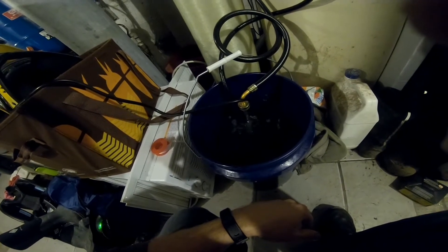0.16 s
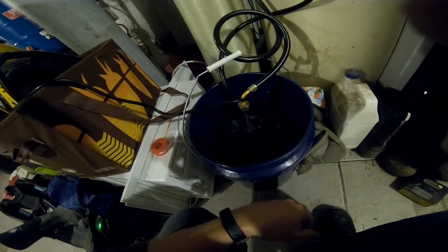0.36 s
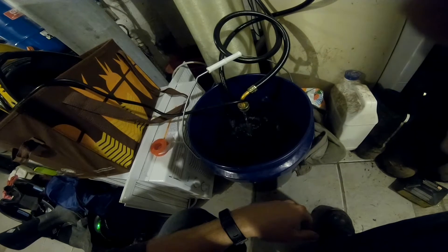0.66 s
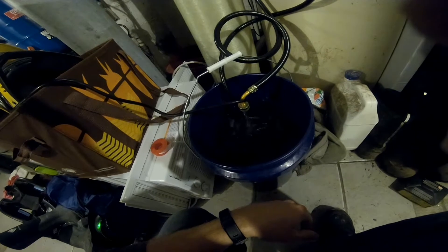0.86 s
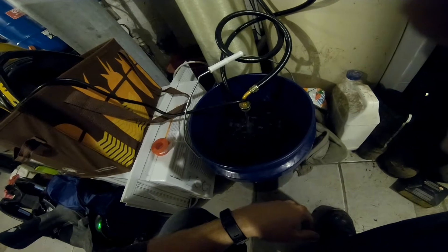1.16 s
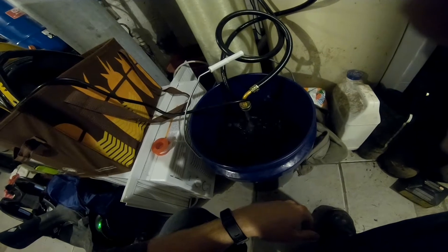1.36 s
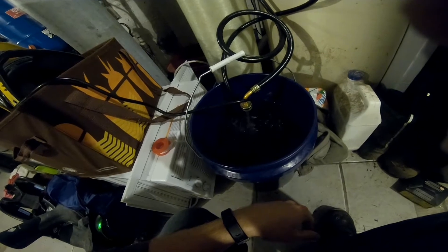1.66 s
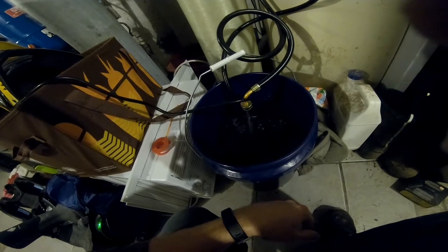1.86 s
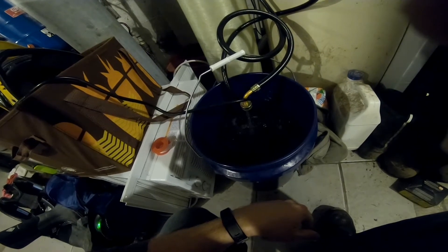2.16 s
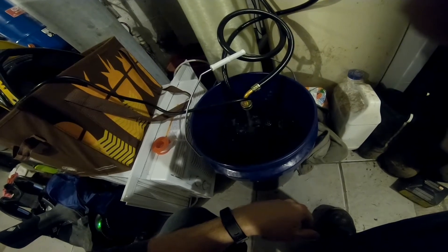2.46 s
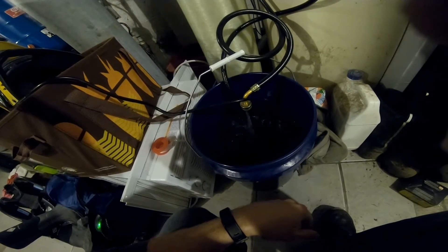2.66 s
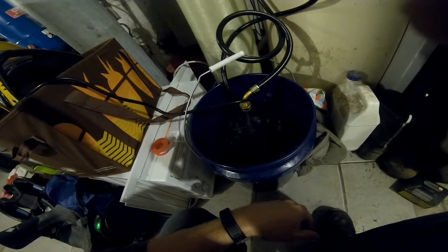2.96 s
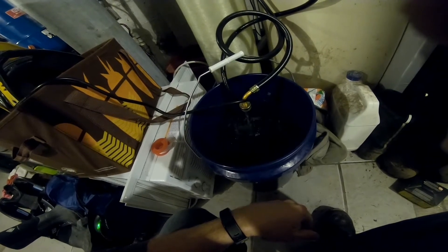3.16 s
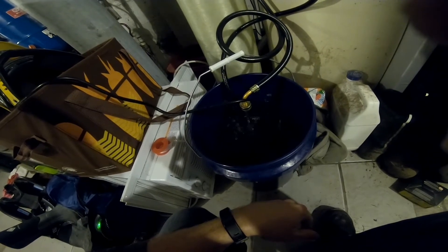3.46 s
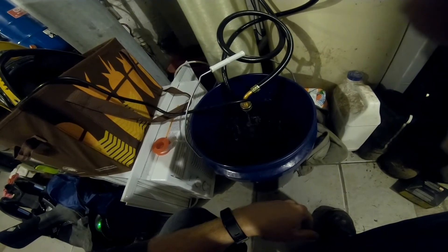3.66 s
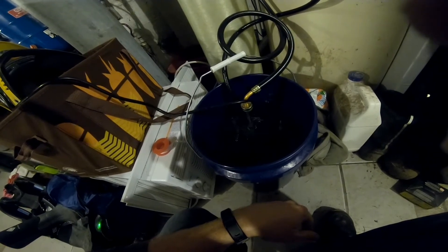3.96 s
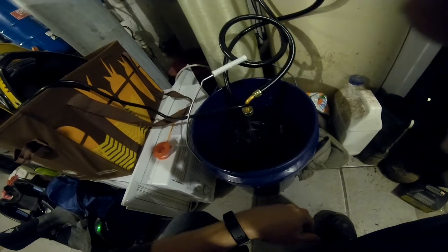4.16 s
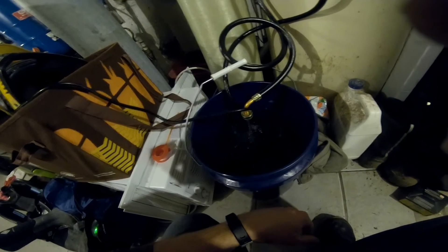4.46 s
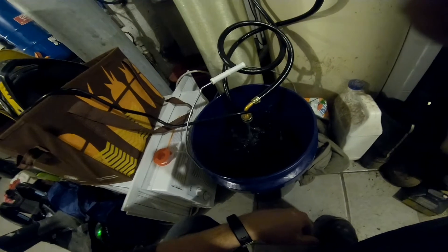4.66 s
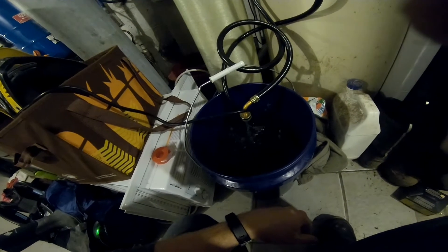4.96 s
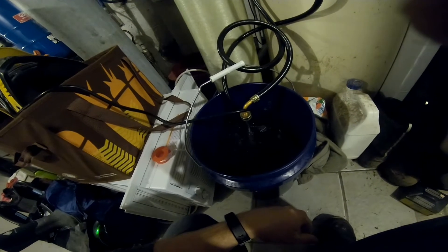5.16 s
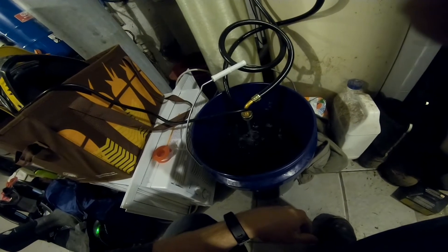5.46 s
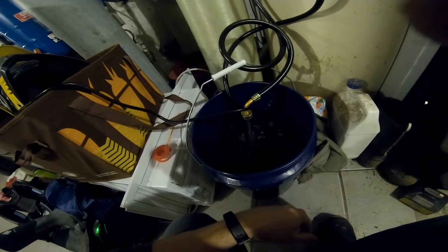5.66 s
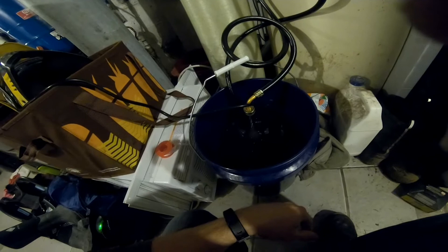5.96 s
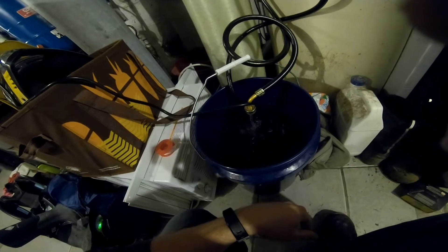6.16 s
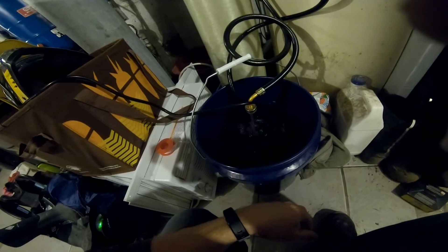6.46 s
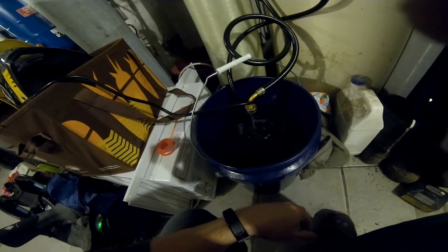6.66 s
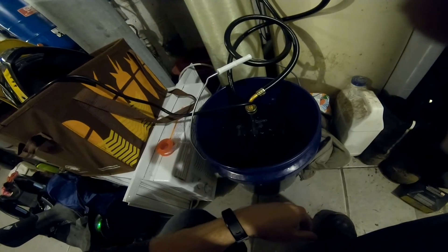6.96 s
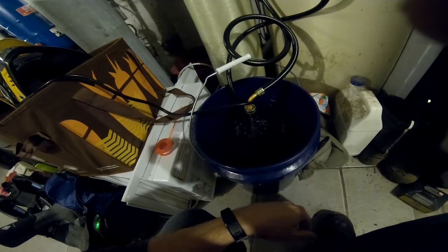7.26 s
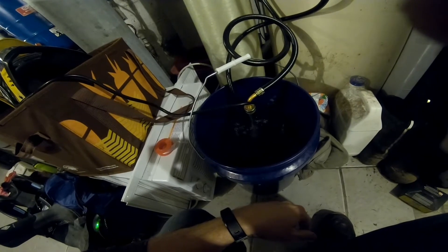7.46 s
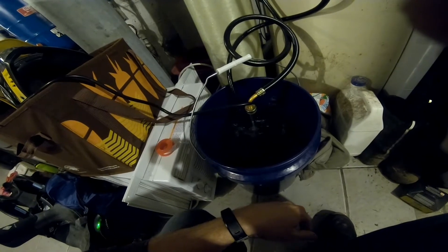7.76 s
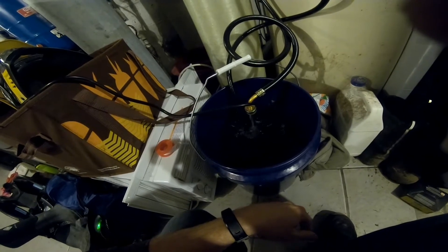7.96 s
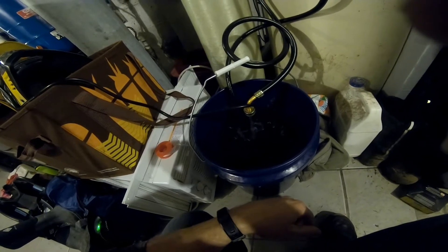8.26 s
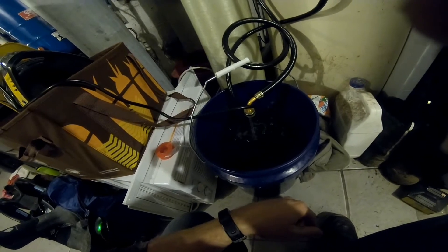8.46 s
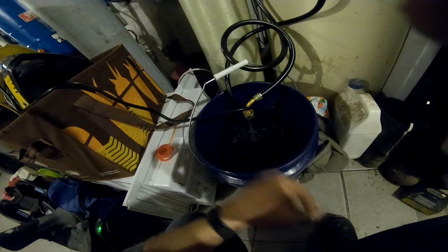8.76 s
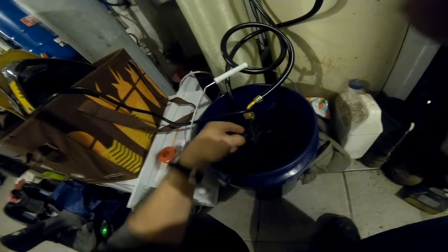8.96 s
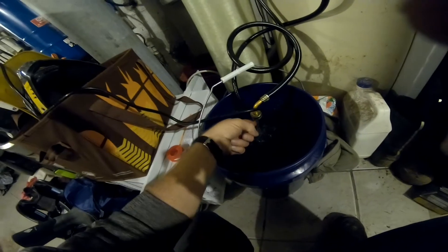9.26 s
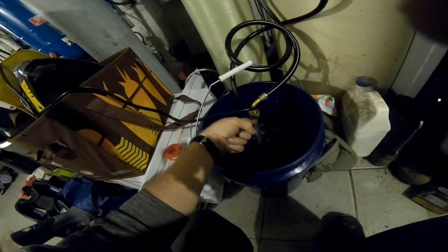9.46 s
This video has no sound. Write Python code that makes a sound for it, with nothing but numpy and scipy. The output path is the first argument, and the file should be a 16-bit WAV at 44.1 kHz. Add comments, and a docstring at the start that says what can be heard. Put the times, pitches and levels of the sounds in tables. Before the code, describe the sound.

From 0 to about 9.6 seconds a hose pours liquid continuously into a plastic bucket, heard close in stereo. A small pump holds a steady low hum, wavering slightly, with a dull watery wash and a deep rumble whose strength drifts, fuller around 2.6 to 3.4 and 6.6 seconds. Over it come irregular bright spits, several per second, tiny ticks, short rising chirps and fine fizz, ringing briefly in the bucket with a very short room echo. Strong spits stand out near 3.7, 3.9, 5.25 and 7.5; splash clusters near 1.5, 2.4, 4.9 to 5.2, 6.5 and 8.8. Hollow mid-low gurgles recur about once a second, clearer near 0.4, 1.2, 5.4, 8.1 and 9. Two very deep soft thuds fall at 8.0 and 8.8 as the microphone holder shifts. The highest treble is muted, and the pouring never stops.

```python
"""A hose pours liquid back into a plastic bucket in which a small submersible pump runs.
The falling stream spits, bubbles and splashes: short sines with climbing pitch, clicks and noise,
sent through the ringing bucket to two nearby microphone ports. Larger bubbles gurgle below.
The pump motor hums on multiples of twice the mains frequency, as sines that waver a little.
Moving liquid gives filtered noise: a dull wash, and a rumble through bucket and floor."""
import sys
import numpy as np
from scipy import signal
from scipy.fft import rfft, irfft, next_fast_len
from scipy.io import wavfile
from scipy.ndimage import uniform_filter1d

SR = 44100
rng = np.random.default_rng(int(sys.argv[2]) if len(sys.argv) > 2 else 0)


def dump(signal):
    """Clip the signal to [-1, 1] and save it as 16-bit WAV at the path in sys.argv[1]."""
    limited = np.clip(np.atleast_2d(signal).T, -1, 1)
    pcm = np.round(limited * 32767).astype(np.int16)
    wavfile.write(sys.argv[1], SR, pcm)


N = 424241  # length in samples

# How far the left port runs ahead of the right. Each row: frequency in Hz, lead in radians.
LEAD_OF_LEFT = [(30, 0), (400, -.15), (600, 0), (720, 2.1), (2100, 1.8), (3000, 1), (3250, 0), (3800, 1),
                (4700, -.3), (5600, 0), (6900, -.5), (7700, -2.3), (8600, 0)]
# Treble loss of the microphone ports. Each row: frequency in Hz, level in dB.
PORT_LOSS = [(6800, -1), (7600, -4), (8500, -16), (10000, -21.5), (12000, -38.5), (15000, -46)]
# Tone colour of the small drops. Each row: frequency in Hz, relative level in dB.
DROP_COLOUR = [(700, 0), (1300, -5.5), (2400, -1.5), (3500, -5.5), (5000, -2.5), (6400, -1), (8000, -6),
               (9500, -2.5), (12000, -23)]


def gain_of(db):
    """Turns decibels into a factor."""
    return 10 ** (np.asarray(db) / 20)


def evened(x):
    """Scales a sound to an average (rms) level of 1."""
    return x / np.sqrt(np.mean(x ** 2) + 1e-20)


def read(points, hz):
    """Reads a table at the frequencies hz, with straight lines between points on a log scale."""
    f, value = np.transpose(points)
    return np.interp(np.log(hz + 1), np.log(f + 1), value)


def shaped(x, gain):
    """Filters x by a gain given as a function of frequency."""
    size = next_fast_len(N + 8192)  # spare room for the ringing after the end
    spectrum = rfft(x, size) * gain(np.fft.rfftfreq(size, 1 / SR))
    return irfft(spectrum, size)[..., :N]


def add(mix, s, sound):
    """Adds a sound to the mix at s seconds."""
    part = mix[round(s * SR):][:len(sound)]
    part += sound[:len(part)]


def modes(table, hz):
    """Resonances: each answers most at its own frequency, over its own width."""
    return sum(gain_of(db) / (1 + 2j * (hz - f) / width) for f, width, db in table)


def scatter(per_s, spread_db, clumps):
    """Random clicks of uneven size, more frequent where clumps is high."""
    happens = rng.random(N) < per_s * clumps / SR
    return happens * gain_of(spread_db * np.minimum(rng.exponential(1, N), 2.9))


def hum():
    """The magnetic pull in the motor makes steady tones that waver a little in level."""
    # Each row: multiple of the pull rate, left level in dB, right level in dB, left's lead in radians.
    tones = [(3, -43.5, -42.5, 0.2), (7, -63, -47, 1.95), (10, -77, -72, 0.45), (11, -64.5, -67, 1.27)]
    pull_hz = 119.93  # twice the mains frequency
    t = np.arange(N) / SR
    out = np.zeros((2, N))
    for order, left_db, right_db, lead in tones:
        waver = gain_of(0.98 * evened(uniform_filter1d(rng.standard_normal(N), 9000)))
        turn = 2 * np.pi * (order * pull_hz * t + rng.random())
        both = np.sin([turn + lead, turn])
        out += np.sqrt(2) * waver * gain_of([[left_db], [right_db]]) * both
    return out


def wash():
    """Pump and swirling liquid make dull steady noise, only partly alike at the two ports."""
    # Tone colour of the wash. Each row: frequency in Hz, relative level in dB.
    spectrum = [(71, -37), (120, 2.5), (273, -15.5), (308, -14.5), (366, -14.5), (408, -19.5), (637, -29.5),
                (766, -32.5), (835, -23), (911, -25), (1010, -31.5), (1500, -39), (1600, -46.5),
                (2080, -67)]
    # Each row: frequency in Hz, likeness of left and right from 0 to 1.
    likeness = [(100, 0.99), (260, 0.97), (450, 0.91), (620, 0.14), (900, 0.65), (1600, 0.94)]
    a, b = rng.standard_normal((2, N))
    same = lambda hz: read(likeness, hz)
    colour = lambda hz: gain_of(read(spectrum, hz))
    delay = lambda hz: np.exp(-1j * read(LEAD_OF_LEFT, hz))
    left = shaped(a, colour)
    right = shaped(a, lambda hz: colour(hz) * same(hz) * delay(hz))
    right += shaped(b, lambda hz: colour(hz) * np.sqrt(1 - same(hz) ** 2))
    return gain_of(-34) * evened(np.array([left, gain_of(0.5) * right]))


def thuds():
    """Soft deep thuds as the person holding the microphone shifts: short swells of a very low sine."""
    # Each row: middle in seconds, level in dB.
    shifts = [(8.02, -18), (8.77, -19)]
    thud_hz, thud_s = 17.4, 0.16
    t = np.arange(0, thud_s, 1 / SR)
    sway = np.hanning(len(t)) * np.sin(2 * np.pi * thud_hz * t)
    out = np.zeros(N)
    for middle, db in shifts:
        add(out, middle - thud_s / 2, gain_of(db) * sway)
    return out


def rumble():
    """Low noise in the resonances of floor and walls; its deep and upper parts waver apart."""
    # How the low noise happens to rise and fall.
    # Each row: time in seconds, upper part in dB, deep part in dB.
    rumble_levels = [(0.0, -28.5, -22), (0.13, -29, -33.5), (0.45, -24, -23), (0.7, -25, -32.5),
                     (1.5, -29, -25), (2.22, -25.5, -34), (2.33, -38, -41), (2.57, -19, -25.5),
                     (2.97, -20, -35), (3.08, -28, -23.5), (3.4, -21, -29), (3.54, -27.5, -30.5),
                     (4.5, -22.5, -30), (4.75, -27, -32.5), (5.28, -22, -31.5), (6.27, -29, -24),
                     (6.54, -20.5, -35), (6.59, -24.5, -18.5), (6.7, -29, -44), (7.07, -23, -23.5),
                     (7.34, -24.5, -34), (8.68, -26.5, -24.5), (9.0, -31, -31), (9.14, -20.5, -24),
                     (9.62, -30.5, -33.5)]
    # Floor and wall resonances, squared below so that the dB double.
    # Each row: frequency in Hz, width in Hz (6 dB down once squared), half the level in dB.
    resonances = [(40.3, 8.9, 0.5), (51.8, 14.5, -2), (74.5, 9.6, -3.5), (82.2, 14.7, -1), (112, 33.4, -8),
                  (140, 27, -11.5), (191, 10, -32)]
    s, *levels_db = np.transpose(rumble_levels)
    t = np.arange(N) / SR
    noise, apart = rng.standard_normal((2, N))

    def colour(hz):
        power = sum(abs(modes([mode], hz)) ** 4 for mode in resonances)
        return np.sqrt(power) * hz ** 2 / (hz ** 2 + 20.0 ** 2)  # weaker below 20 Hz

    above = lambda hz, edge_hz: (1 + np.tanh((hz - edge_hz) / 4)) / 2  # soft step
    upper = lambda hz: above(hz, 57.0) - above(hz, 99.0)
    deep = lambda hz: 1 - above(hz, 59.2)
    out = np.zeros(N)
    for db, band in zip(levels_db, (upper, deep)):
        part = evened(shaped(noise, lambda hz: colour(hz) * band(hz)))
        part /= uniform_filter1d(part ** 2, 5000) ** 0.3 + 0.5  # a driven, fairly even shaking
        out += gain_of(np.interp(t, s, db)) * evened(part)
    # the part above 100 Hz keeps a steady level
    out += gain_of(-33) * evened(shaped(noise, lambda hz: colour(hz) * above(hz, 100.2)))
    out += thuds()
    apart = gain_of(-47) * evened(shaped(apart, colour))  # opposite at the two ports
    return out * gain_of([[-.2], [.2]]) + np.array([apart, -apart])


def gurgle(hz):
    """One large bubble of trapped air: a slow swell and fall whose pitch climbs."""
    t = np.arange(5000) / SR
    return t / 0.013 * np.exp(1 - t / 0.0091) * np.sin(2 * np.pi * hz * t * (.98 + .5 * t))


def gurgles():
    """Large slow bubbles under the stream: a few loud ones over many soft ones that come in surges."""
    # Each row: start in seconds, level in dB, approximate pitch in Hz.
    trapped_air = [(0.434, -28.5, 438), (1.17, -28, 432), (1.594, -29.5, 434), (2.165, -30.5, 440),
                   (2.258, -31, 437), (2.764, -30, 450), (3.697, -31, 436), (4.599, -37, 466),
                   (5.437, -28, 444), (6.438, -33, 454), (7.292, -33.5, 448), (8.085, -27.5, 438),
                   (8.987, -28.5, 468), (9.531, -33.5, 528)]
    out = np.zeros(N)
    for s, db, hz in trapped_air:
        add(out, s, gain_of(db) * gurgle(hz))
    surges = gain_of(4.0 * evened(uniform_filter1d(rng.standard_normal(N), 7000)))
    soft = np.zeros(N)
    for hz in np.linspace(400, 495, 12):
        soft += signal.oaconvolve(scatter(10., 5.0, surges), gurgle(hz))[:N]
    return out + gain_of(-49.0) * evened(soft)


def ports(hz):
    """Splits bucket sound between the two ports, which differ in level and phase."""
    # Each row: frequency in Hz, left minus right level in dB.
    left_more = [(500, -5), (800, -16.5), (1200, 2), (2100, 0.5), (2900, 6), (3500, -0.5), (4300, -1),
                 (4700, -6.5), (5200, -14), (5750, 19), (6200, -13), (7300, 3), (8300, 6), (11000, 0)]
    half = gain_of(read(left_more, hz) / 2) * np.exp(.5j * read(LEAD_OF_LEFT, hz))
    return np.array([half, 1 / half])


def echoes(x, t60):
    """Walls and floor throw back sparse echoes.

    Several random echo patterns take turns at a fixed pace, so no single one colours the sound."""
    # 4 patterns of 3 tails each, fading by 60 dB in t60 seconds
    at = np.arange(60, 6000, 20) + rng.integers(0, 20, (4, 3, 297))
    taps = np.zeros((4, 3, 6100))
    heights = rng.choice([-1., 1.], at.shape) * gain_of(-60 * at / SR / t60)
    np.put_along_axis(taps, at, heights, 2)
    pattern = np.arange(N) // 1500 % 4  # the next pattern takes over every 1500 samples
    out = np.zeros((3, N))
    for k, tail in enumerate(taps):
        piece = (x * (pattern == k))[None]
        out += signal.oaconvolve(piece, tail / np.linalg.norm(tail[0]), axes=1)[:, :N]
    return out


def bucket(x):
    """The air in the bucket rings at its own pitches, and the walls add a short tail."""
    # Air resonances. Each row: frequency in Hz, width in Hz, strength in dB.
    air = [(1680, 197, 6.5), (2200, 182, 8), (2700, 220, 6), (4120, 210, -2), (4730, 250, -4),
           (6190, 194, -1.5), (6650, 350, -5.5)]
    rung = shaped(x, lambda hz: 0.56 + modes(air, hz))  # 0.56 is the direct sound
    shared, left, right = echoes(rung, 0.036)
    return shaped(rung + gain_of(-6.5) * shared, ports) + gain_of(-4.5) * np.array([left, right])


def bubble(hz, ring_ms, glide, rise_ms=0.23):
    """A bubble rings as a dying sine whose pitch climbs as it nears the surface."""
    t = np.arange(2600) / SR * 1000  # milliseconds
    shape = (1 - np.exp(-t / rise_ms)) * np.exp(-t / ring_ms)
    pitch = hz * (1 + glide * np.tanh(t / ring_ms))
    return shape / shape.max() * np.sin(2 * np.pi * np.cumsum(pitch) / SR)


def spit(hz, chance):
    """A cluster of tiny bubbles bursting around one pitch, swelling for a moment."""
    out = np.zeros(3200)
    for k, (when, pitch) in enumerate(chance.reshape(-1, 2)):
        tiny = bubble(hz * (1 + .22 * (pitch - .55)), 0.64, 0.046, 0.15)
        add(out, (k + when) * 0.00045, (k + 1) * 0.58 ** k * tiny)
    return out / abs(out).max()


def tick(chance):
    """The bare impact of a drop: a few milliseconds of broad crackle."""
    t = np.arange(len(chance)) / SR * 1000  # milliseconds
    return np.diff(chance, prepend=0) * t / 1.49 * np.exp(1 - t / 1.44)


def swarm(pitches_hz, per_s, spread_db, clumps):
    """Many small bubbles; every other size rings on for longer and chirps further upward."""
    out = np.zeros(N)
    for k, hz in enumerate(pitches_hz):
        cycles, glide = [(3, .1), (5, .3)][k % 2]  # ring time in cycles, share the pitch climbs
        grain = bubble(hz, 1000 * cycles / hz, glide, 0.12)[:1200] / np.sqrt(cycles)
        grain = gain_of(read(DROP_COLOUR, hz)) * hz * grain
        out += signal.oaconvolve(scatter(per_s, spread_db, clumps), grain)[:N]
    return evened(out)


def splashes():
    """Each splash opens a dense swarm of large and of small bubbles for a moment."""
    # Loudest splashes. Each row: peak time in seconds, level in dB before the bucket,
    # share of the power made by the larger bubbles from 0 to 1.
    bursts = [(0.364, -39, 0), (1.427, -37, 0.9), (1.473, -30, 0.1), (1.843, -32.5, 0), (2.015, -37, 0.99),
              (2.257, -39.5, .9), (2.364, -31, 0.14), (2.785, -36, 0.4), (3.144, -35, 0), (4.802, -33, 0.4),
              (4.892, -29.5, 0.01), (4.955, -37.5, 0.2), (5.031, -34, 0.4), (5.173, -31, 0),
              (5.473, -33.5, 1), (5.715, -36, 0.2), (6.395, -39, 0), (6.531, -27, 0.06),
              (6.68, -31.5, 0.01), (7.762, -41, 0), (8.11, -33.5, 0), (8.807, -29.5, 0.6),
              (9.103, -33.5, 0.66)]
    rise_s, fall_s = 0.0049, 0.007
    large, small = np.zeros((2, N))
    lead = 600 / SR  # the swell starts this long before its peak
    t = np.arange(0, .07, 1 / SR) - lead
    swell = np.exp(-abs(t) / np.where(t < 0, rise_s, fall_s))
    for s, db, share in bursts:
        add(large, s - lead, gain_of(db) * np.sqrt(share) * swell)
        add(small, s - lead, gain_of(db) * np.sqrt(1 - share) * swell)
    large *= swarm(np.geomspace(1500, 3200, 8), 90., 11.0, 0.9)
    small *= swarm(np.geomspace(3600, 8500, 8), 250., 4.4, 0.93)
    return large + small


def stream():
    """Falling liquid traps air: loud spits, bubbles and splashes over clumps of small bubbles and ticks."""
    # Loud spits on the surface. Each row: start in seconds, level in dB before the bucket,
    # middle pitch in Hz, impact tick level in dB with the ports' treble loss included.
    spits = [(0.08, -30, 6960, -66.5), (0.2895, -33, 5900, -71), (0.3172, -30, 6730, -50.5),
             (0.3564, -36.5, 6170, -50), (0.4332, -19, 5920, -76), (0.5555, -21, 6140, -78),
             (0.774, -21.5, 6760, -49.5), (0.8742, -22.5, 5200, -57), (0.947, -22.5, 6130, -78),
             (1.041, -28.5, 6270, -52), (1.1652, -23, 4730, -66), (1.303, -26.5, 6860, -75),
             (1.3578, -27, 4860, -78), (1.4468, -23.5, 5650, -55.5), (1.5272, -20.5, 7140, -59),
             (1.631, -25, 6190, -54), (1.699, -24, 7140, -70), (1.8418, -26, 6190, -62.5),
             (1.9125, -32.5, 6240, -78), (1.988, -22.5, 6070, -79), (2.052, -25.5, 6300, -63),
             (2.21, -17.5, 6250, -58.5), (2.3127, -22.5, 6150, -63), (2.5156, -18, 5960, -49),
             (2.846, -23.5, 7740, -66), (2.9912, -29, 6600, -66), (3.082, -17, 5940, -71),
             (3.215, -35.5, 7750, -50.5), (3.41, -21, 5950, -49), (3.549, -20.5, 6600, -51.5),
             (3.6062, -27.5, 6840, -72), (3.6396, -29.5, 4260, -84), (3.693, -12, 6190, -66),
             (3.809, -25.5, 6460, -63), (3.871, -15.5, 6270, -53), (3.912, -30, 5040, -77),
             (4.0943, -17, 6750, -54), (4.1418, -32, 4620, -49.5), (4.401, -23, 6600, -84),
             (4.4953, -25.5, 6630, -73), (4.741, -25.5, 4750, -78), (5.1634, -29.5, 5940, -56),
             (5.247, -16, 6190, -67), (5.2874, -18, 6190, -48.5), (5.3921, -28, 6700, -84),
             (5.434, -19.5, 6100, -79), (5.4878, -22, 6650, -72), (5.5682, -28, 6640, -73),
             (5.8138, -31, 5160, -52.5), (5.8406, -22.5, 6650, -75), (5.8985, -31.5, 5670, -62),
             (6.028, -23, 6200, -54), (6.3429, -29, 6320, -53), (6.417, -27, 4600, -72),
             (6.433, -28, 6100, -53), (6.5942, -35, 6200, -53), (6.9356, -32, 4800, -65),
             (6.955, -19.5, 6750, -52.5), (7.0855, -26.5, 3810, -82), (7.1346, -32.5, 3880, -77),
             (7.1515, -18, 5870, -73), (7.178, -24, 6000, -72), (7.287, -23.5, 5340, -53.5),
             (7.4897, -14.5, 5560, -55.5), (7.7941, -26.5, 6100, -50), (8.2737, -30.5, 6900, -58),
             (8.297, -26.5, 6230, -64), (8.3837, -24, 5760, -78), (8.4982, -18, 5880, -47),
             (9.1313, -19.5, 5200, -60), (9.199, -29.5, 6900, -61), (9.326, -20, 6360, -81),
             (9.371, -16, 6250, -48.5), (9.433, -18, 6660, -80)]
    # Loud bubbles, from low plops to rising chirps. Each row: start in seconds, level in dB
    # before the bucket, starting pitch in Hz, ring time in ms, share the pitch climbs.
    chirps = [(0.778, -39.5, 1520, 1.9, .05), (0.915, -35, 940, 5, 0.015), (1.473, -28.5, 2370, 1, 0.032),
              (1.634, -37.5, 1710, 2.6, .05), (1.766, -31, 925, 6.3, .02), (1.837, -28.5, 2400, 2.1, .05),
              (1.989, -25.5, 1600, 0.73, 0.055), (2.181, -30.5, 2970, 1.1, 0.063),
              (2.312, -29.5, 2840, 1.3, 0.052), (2.515, -31.5, 2780, 1.3, 0.067),
              (2.588, -34.5, 2780, 1.3, .06), (2.691, -36.5, 2740, 2, 0.032), (2.718, -43, 2600, 1.7, .05),
              (2.757, -36.5, 934, 4.6, 0.68), (3.081, -36, 2720, 1.3, 0.045), (3.214, -31, 1760, 3, .05),
              (4.097, -34, 2700, 1.2, 0.042), (4.545, -38, 2550, 1.7, .1), (4.638, -34, 2180, 1.3, .05),
              (5.267, -26, 3060, 1.1, 0.09), (5.418, -31, 2700, 1, 0.041), (5.468, -25, 2430, 0.78, 0.064),
              (5.759, -32.5, 2400, 1.3, 0.039), (6.232, -38, 885, 4.5, .02), (6.383, -39.5, 1556, 11, 0.49),
              (6.733, -31, 2170, 1.1, 0.046), (6.913, -38, 2360, 1.3, .12), (6.957, -38, 1590, 2.1, 0.074),
              (7.026, -31.5, 2180, 1.2, 0.062), (7.047, -33.5, 3000, 2.5, .12), (7.087, -29, 3550, 2, .05),
              (7.49, -31, 2740, 1.1, .05), (7.809, -36.5, 880, 7.3, .02), (7.895, -24.5, 2450, 1.3, 0.036),
              (7.938, -34, 2880, 2, .05), (8.032, -34, 2920, 1.1, 0.068), (8.509, -32.5, 1550, 1.1, .05),
              (8.546, -32.5, 2133, 2.6, 0.045), (8.737, -24.5, 2880, 0.84, 0.045),
              (8.802, -31, 2240, 1.3, 0.046), (8.826, -34, 890, 3.5, 0.057),
              (8.965, -28.5, 2880, 1.2, 0.033), (8.982, -17, 3340, 0.28, 0.063),
              (9.052, -33, 2550, 1.7, .3), (9.073, -29.5, 2040, 3.2, 0.32), (9.376, -36, 2970, 2.2, 0.063),
              (9.461, -40, 2610, 2.7, 0.04), (9.503, -43.5, 2640, 2.9, 0.024)]
    loud = splashes()
    port_loss_db = read(PORT_LOSS, 10730)  # made up for in the ticks, at 10730 Hz
    chances = zip(rng.random((len(spits), 12)), rng.standard_normal((len(spits), 400)))
    for (s, db, hz, tick_db), (chance, crackle) in zip(spits, chances):
        add(loud, s, gain_of(db) * spit(hz, chance))
        add(loud, s - 0.0005, gain_of(tick_db - port_loss_db) * tick(crackle))  # impact comes first
    for s, db, hz, ring_ms, climb in chirps:
        add(loud, s, gain_of(db) * bubble(hz, ring_ms, climb, 0.3 * ring_ms))

    clumps = gain_of(3.4 * evened(uniform_filter1d(rng.standard_normal(N), 1200)))
    small = swarm(np.geomspace(700, 9000, 32), 42., 6.54, clumps)
    ticks = np.zeros(N)
    for crackle in rng.standard_normal((3, 400)):
        ticks += signal.oaconvolve(scatter(6.4, 12.0, clumps), tick(crackle))[:N]
    fizz = shaped(rng.standard_normal((3, N)), lambda hz: gain_of(read(DROP_COLOUR, hz)))
    fizz = evened(fizz * clumps ** 0.28)
    # the first fizz rings in the bucket, the other two come back from the walls
    drops = loud + gain_of(-46) * small + gain_of(-55.5) * evened(ticks) + gain_of(-60.5) * fizz[0]
    return drops, gain_of(-51.5) * fizz[1:]


def scene():
    """Everything that reaches the two ports."""
    drops, fizz = stream()
    return bucket(drops) + fizz + gurgles() + hum() + rumble() + wash()


def record(dry):
    """The ports lose the top treble, the preamplifier hisses faintly; then a low-pass limits the band."""
    dull = shaped(dry, lambda hz: gain_of(read(PORT_LOSS, hz)))
    dull += gain_of(-85.5) * rng.standard_normal(dry.shape)
    low_pass = signal.firwin(511, 15500, window=("kaiser", 9), fs=SR)  # edge at 15500 Hz
    return signal.oaconvolve(dull, low_pass[None], "same", axes=1)


dry = scene()
out = record(dry)
dump(out)
```